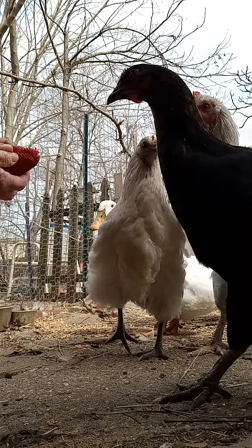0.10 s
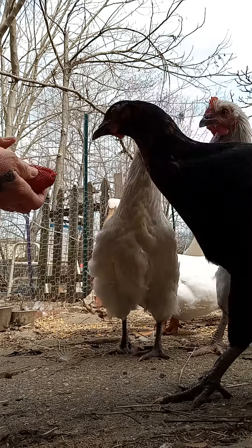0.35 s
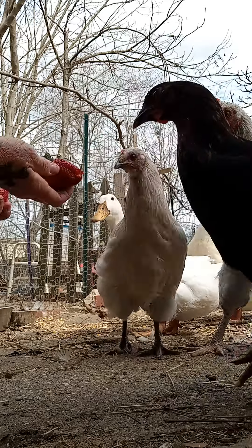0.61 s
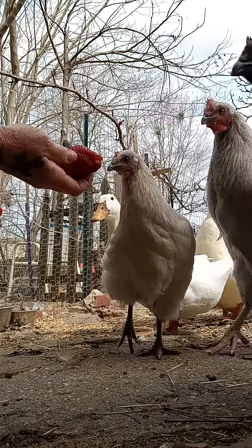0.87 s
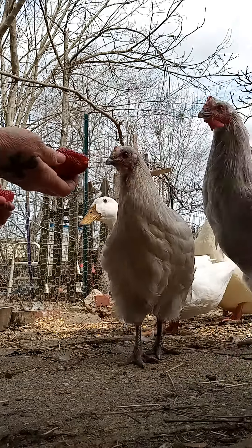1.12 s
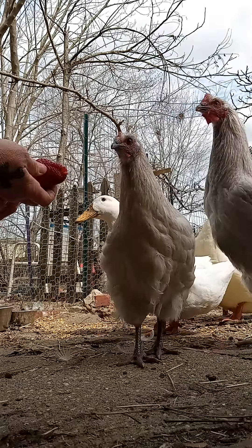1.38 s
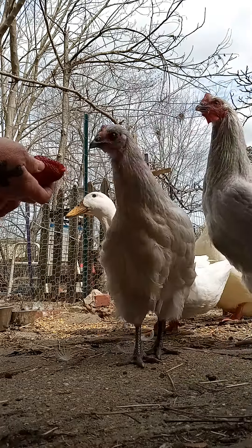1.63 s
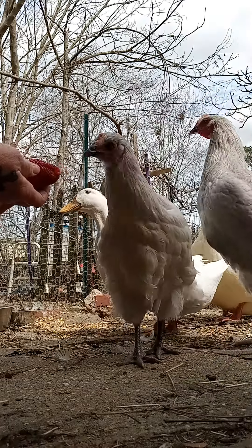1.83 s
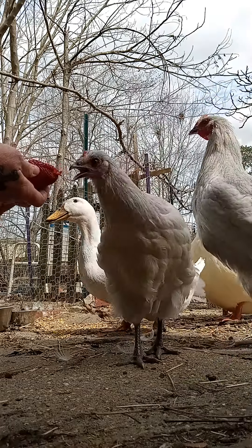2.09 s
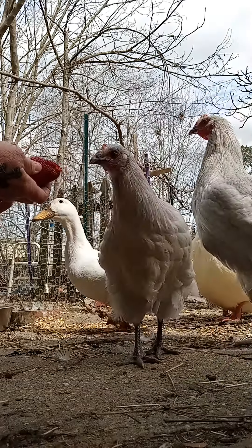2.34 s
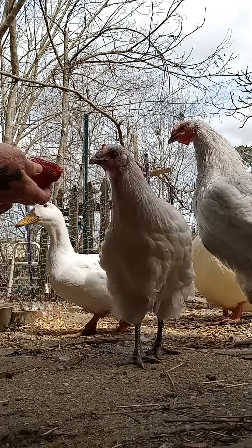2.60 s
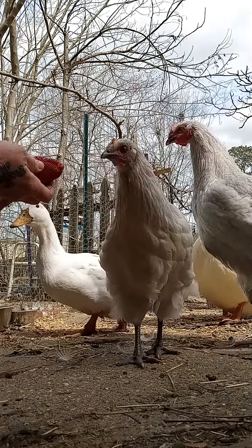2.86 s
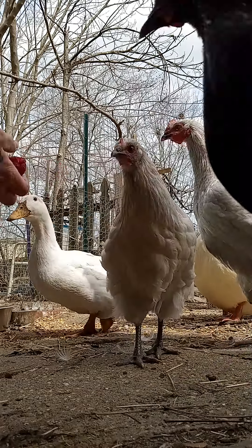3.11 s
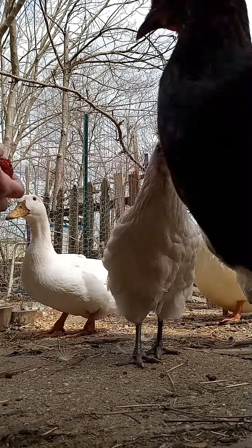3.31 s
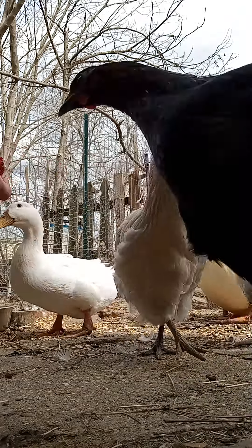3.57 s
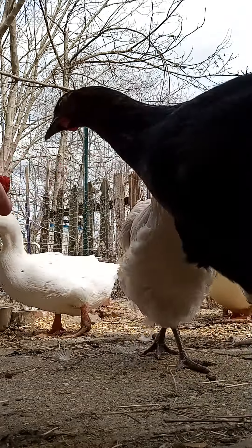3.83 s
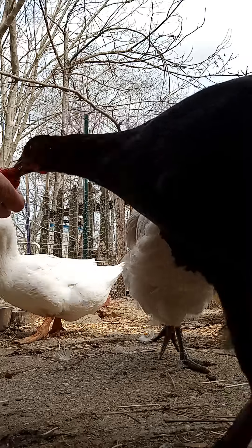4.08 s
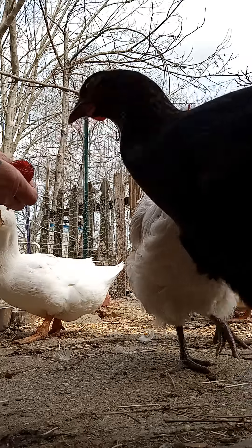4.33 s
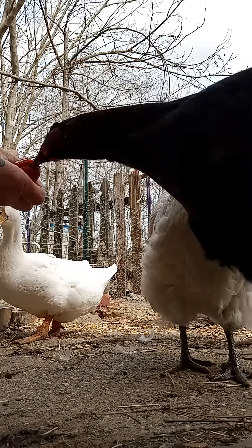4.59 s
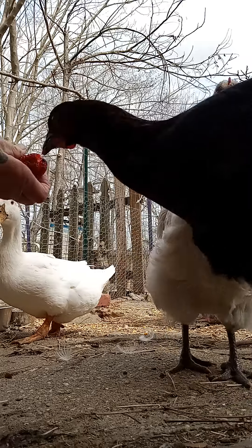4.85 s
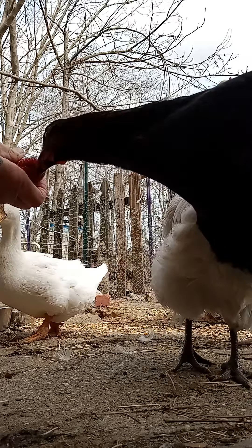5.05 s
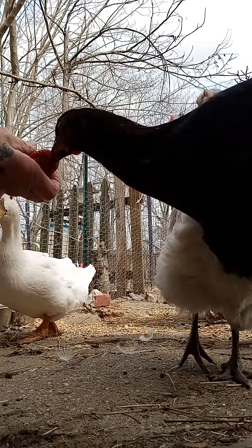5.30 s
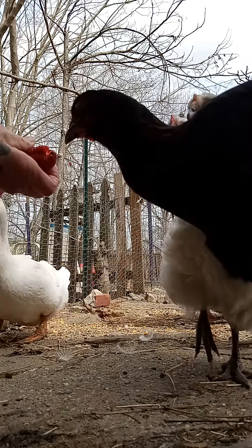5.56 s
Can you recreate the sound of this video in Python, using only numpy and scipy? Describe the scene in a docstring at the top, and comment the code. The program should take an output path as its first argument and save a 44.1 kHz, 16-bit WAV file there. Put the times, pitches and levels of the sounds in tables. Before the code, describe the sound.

Ducks rasp in quick, breathy low quacks while chickens cluck and peep close by, with loud squeak-led quacks around two seconds, outdoors.

```python
"""Low clucks over steady yard noise and a far engine drone, close to a two-port microphone; loud quacks later.
Litter rustles (noise grains), drakes rasp (breathy pulses through resonances), a duck gives arched peeps
(gliding tones), short high tones decay, and coos, falling peeps and squeaks glide (overtones).
Later a far bird whistles (near sines) and bills tap (noise knocks through short modes)."""
import sys
import numpy as np
from scipy import signal
from scipy.io import wavfile

SR = 44100
rng = np.random.default_rng(int(sys.argv[2]) if len(sys.argv) > 2 else 0)


def store_wav(level_fs):
    """Save 16-bit WAV to argv[1]."""
    pcm = np.round(np.clip(np.atleast_2d(level_fs), -1, 1) * 32767)
    wavfile.write(sys.argv[1], SR, pcm.T.astype(np.int16))


def volts_from_decibels(level):
    """Turn decibel levels (scalar or array-like) into linear amplitude factors."""
    exponent = np.asarray(level, float) / 20
    return 10 ** exponent


N = 250929


def rms_one(x):
    """Scales to unit rms."""
    return x / np.sqrt(np.mean(x ** 2) + 1e-20)


def at_time(rows, sample):
    """Table columns interpolated linearly in time."""
    s, *columns = np.transpose(rows)
    return [np.interp(sample / SR, s, c) for c in columns]


def at_hz(points, hz):
    """Table value interpolated over log frequency."""
    table_hz, value = np.transpose(points)
    return np.interp(np.log(hz), np.log(table_hz), value)


def drift(rate_hz, size):
    """Two-pole low-passed noise of unit rms."""
    r = np.exp(-2 * np.pi * rate_hz / SR)
    slow = signal.lfilter([1], [1, -2 * r, r * r], rng.standard_normal(size + 4000))[4000:]
    return rms_one(slow)


def resonance(x, hz, width_hz):
    """Two-pole resonator with zeros at DC and Nyquist."""
    r = np.exp(-np.pi * width_hz / SR)
    b = np.array([1, 0, -1]) * (1 - r * r) / 2
    return signal.lfilter(b, [1, -2 * r * np.cos(2 * np.pi * hz / SR), r * r], x)


def band(x, low_hz, high_hz):
    """Butterworth band-pass."""
    return signal.sosfilt(signal.butter(2, [low_hz, high_hz], "band", fs=SR, output="sos"), x)


def high_pass(hz):
    """Second-order Butterworth high-pass sections."""
    return signal.butter(2, hz, "high", fs=SR, output="sos")


def add(out, x, at, pan_db, lag_ms):
    """Places a sound between the two ports by level (left minus right) and arrival time (left lag)."""
    lag = round(lag_ms * SR / 1000)
    for ear, start, db in ((0, at + max(lag, 0), pan_db / 2), (1, at + max(-lag, 0), -pan_db / 2)):
        out[ear, start:start + len(x)] += volts_from_decibels(db) * x[:N - start]


def arch(share, top_share, rise, fall, bend):
    """How far a rise and fall lies under its top, at each share 0-1 of a call."""
    top_share = np.clip(top_share, .05, .95)
    early = np.maximum(1 - share / top_share, 0)
    late = np.maximum((share - top_share) / (1 - top_share), 0)
    return rise * early ** bend + fall * late ** bend


def span(s, length_s, onset_s=0.0016):
    """First sample, fades at both ends and the share 0-1 of a call that has passed."""
    t = np.arange(round(length_s * SR)) / SR
    fade = np.clip(np.minimum(t / onset_s, (length_s - t) / 0.0041), 0, 1)
    return round(s * SR), fade, t / length_s


def pulses(per_s, jitter, spread_db, breath, puff_s):
    """One uneven flap per cycle, each followed by a decaying puff of turbulent air."""
    size = len(per_s)
    rate = per_s * (1 + jitter * drift(60, size))
    cycle = np.floor(rng.random() + np.cumsum(rate) / SR)
    flaps = np.diff(cycle, prepend=cycle[0]) * volts_from_decibels(spread_db * rng.standard_normal(size))
    puffs = signal.lfilter([1], [1, -np.exp(-1 / (puff_s * SR))], flaps)
    return flaps + breath * puffs * rng.standard_normal(size) + 1e-18


def breath_noise(turn, low_hz, high_hz):
    """Air noise gated by the voice's phase, with steep band edges."""
    gated = rng.standard_normal(len(turn)) * (1 + np.sin(turn))
    return rms_one(band(band(gated, low_hz, high_hz), low_hz, high_hz))


# low clucks and squeak-led loud quacks: t/s, length/s, first f/Hz, last f/Hz, level/dB
CLUCKS_QUACKS = [(0.0, 0.014, 201.2, 203.5, -30.5), (0.037, .062, 172.8, 169.4, -25.5),
                 (1.028, 0.04, 215.7, 183.9, -32.5), (1.251, 0.037, 268.3, 267, -37),
                 (1.828, 0.062, 218.5, 163.6, -32.5), (2.14, 0.091, 238.7, 172.3, -25),
                 (2.504, 0.082, 239.2, 171.2, -23.5)]
# throat resonances shared by both: f/Hz, width/Hz, level/dB
THROAT = [(219, 270, 4), (560, 86, 5), (688, 59, 3), (1099, 107, 5), (1310, 104, -1), (1637, 74, -2.5),
          (2258, 310, -9.5), (3003, 98, -18), (3717, 105, -11.5), (4080, 300, -20.5), (5760, 660, -18),
          (7170, 77, -45), (10200, 510, -43.5), (15130, 1300, -48)]
# left-right place of the calls: t/s, left-right level/dB, left lag/ms
CALL_AT = [(.05, -3.5, -0.14), (.64, 2, 0.025), (.85, -8.5, -0.063), (1.05, -2, -0.39), (1.27, -2, -0.24),
           (1.8, -6, 0.18), (1.86, -0.5, -0.1), (2.2, -6.5, 0), (2.26, 11, -0.39), (2.4, -7.5, -0.18),
           (2.54, -2, 0.021), (3.7, -28.5, -0.64), (4.3, 10, -0.15), (5.6, -3, -0.16)]


def clucks_and_quacks():
    """Quick, fairly even flaps through fixed throat resonances."""
    out = np.zeros((2, N))
    peak_share, rise_db, fall_db, bend = 0.48, 9.5, 20.5, 2.1
    for s, length_s, first_hz, last_hz, peak_db in CLUCKS_QUACKS:
        at, fade, share = span(s, length_s, onset_s=0.0057)
        hz = first_hz + (last_hz - first_hz) * share ** 1.5   # pitch moves late
        level_db = peak_db - arch(share, peak_share, rise_db, fall_db, bend)
        # tilt per octave: dulls through the call; louder and higher ones are set brighter
        tilt_db = 2 - 3.5 * share
        tilt_db += 0.2769 * (peak_db + 25.5) + 3.7 * np.log2(first_hz / 210)
        rough = np.clip(3600 / len(hz), 1, 2.5)   # short calls are rougher
        source = pulses(hz, jitter=.017 * rough, spread_db=1.8 * rough, breath=.05 * rough, puff_s=.0015)
        # the treble peaks and gives out first
        treble_db = -arch(share, peak_share / 2, 6, 10.3, 1.5)
        voice = 0
        for mode_hz, width_hz, db in THROAT:
            ringing = rms_one(resonance(resonance(source, mode_hz, 2.5 * width_hz), mode_hz, width_hz))
            gain_db = db + tilt_db * np.log2(min(mode_hz, 2500) / 800)
            if mode_hz > 2500:
                gain_db = gain_db + treble_db + 4.1 * drift(70, len(hz))
            voice = voice + volts_from_decibels(gain_db) * ringing
        # rasp between the overtones
        voice += volts_from_decibels(-24) * rms_one(band(source * rng.standard_normal(len(hz)), 500, 2600))
        add(out, volts_from_decibels(level_db - 6.5) * fade * voice, at, *at_time(CALL_AT, at))
    return out


# yard noise spectrum: f/Hz, relative density level/dB
YARD = [(15, -48), (25, -26.5), (108, 2.5), (180, -1), (384, -12.5), (936, -13), (1040, -8), (1130, -17),
        (2350, -21), (4870, -30.5), (6400, -27), (8000, -49), (10000, -33), (12500, -42), (14800, -34.5),
        (16000, -45)]
# left-right likeness of the yard noise: f/Hz, likeness [-1..1]
LIKENESS = [(30, .6), (60, 0.95), (150, 0.97), (300, 0.99), (800, 0.55), (2000, 0), (16000, 0.22)]
# far engine drone: t/s, level/dB (before a fixed trim)
HUM = [(0.0, -71), (0.81, -87), (1.11, -65.5), (2.63, -78), (3.04, -65.5), (3.68, -61.5), (5.69, -88)]


def background():
    """Half-octave bands of stereo noise, each with its own level, flicker and likeness, plus a narrow drone."""
    out, edges_hz = 0, 22 * 2 ** np.arange(0, 9.6, .5)
    white = rng.standard_normal((2, 2, N))   # neighbouring bands get unrelated noise
    for k, (low_hz, high_hz) in enumerate(zip(edges_hz, edges_hz[1:])):
        mid, side = band(band(white[k % 2], low_hz, high_hz), 0.92 * low_hz, 1.09 * high_hz)
        hz = np.sqrt(low_hz * high_hz)
        alike = np.clip(at_hz(LIKENESS, hz), -1, 1)
        flicker = np.repeat(drift(300, N // 50 + 1), 50)[:N]   # held 50 samples: 6 Hz
        stereo = np.sqrt(1 + alike) * mid + np.sqrt(1 - alike) * side * [[1], [-1]]
        out = out + volts_from_decibels(at_hz(YARD, hz) + 2.0 * flicker) * stereo
    drone = rms_one(resonance(resonance(white[0, 0, ::-1], 90.5, 30), 90.5, 30))
    drone_db = at_time(HUM, np.arange(N))[0] - 1.5
    return volts_from_decibels(-60) * rms_one(out) + volts_from_decibels(drone_db) * drone


# clearest hiss bursts: litter rustles, and the hissing top of two loud calls (2.1445 s, 2.5017 s):
# t/s, level/dB, t60/s (clipped when played), lower band level/dB, left-right level/dB
HISSES = [(.0578, -56.5, 0.049, 15, 12.5), (.1055, -54.5, 0.05, -10, -14.5), (.196, -53, .16, 9.5, -5),
          (.4155, -57, 0.13, 18, 2.5), (.7806, -61, 0.38, 1.5, -10), (.8306, -43.5, 0.088, -12.5, -2),
          (.9394, -44.5, .11, 18.5, 4.5), (1.8013, -70, 0.12, 0, -6.5), (2.1041, -57.5, 0.017, -24, 14),
          (2.1445, -49, 0.19, 23.5, -4.5), (2.5017, -47.5, 0.17, 25.5, 1.5), (3.3702, -58, 0.2, -26, 4),
          (3.699, -54.5, 0.09, 21.5, -4.5), (4.0277, -58, 0.06, 8, 9.5), (4.098, -46.5, 0.08, 10.5, -9.5),
          (4.1982, -55.5, 0.12, -13, -12), (4.374, -58, 0.32, 10.5, 8), (4.5096, -60.5, 0.11, 16, -5),
          (4.6833, -52.5, 0.6, 9.5, -4), (4.7558, -50, .056, 14, 7.5), (5.0332, -55, 0.023, -1, -3),
          (5.1163, -56, 0.12, 18.5, -0.5), (5.4036, -60.5, 0.22, 10, 2.5), (5.4783, -49.5, 0.017, -3, -4)]
# hiss top spectrum: f/Hz, relative level/dB
HISS_TOP = [(4410, -37), (7500, -44.5), (8250, -41), (11300, 24), (12800, -45.5), (14000, -41.5),
            (15000, 7), (16000, -1.5)]


def hiss_bursts():
    """Decaying clumps of noise grains: a thin top and a separate lower scratch."""
    top, lower = np.zeros((2, 2, N))
    # 14 faint ones at random, same columns as HISSES
    faint = rng.uniform([0, -67, .06, -5, -8], [N / SR - .3, -61, .16, 5, 8], (14, 5))
    for s, peak_db, t60_s, lower_db, pan_db in [*HISSES, *faint]:
        t60_s = np.clip(t60_s, .05, .2)
        t = np.arange(round(t60_s * SR)) / SR
        clumping = volts_from_decibels(3.5 * drift(300, 16000)[:len(t)])
        grains = rng.standard_normal((2, 16000))[:, :len(t)] * clumping
        burst = volts_from_decibels(peak_db - 6 - 60 * t / t60_s) * np.minimum(t / .008, 1) * grains
        add(top, burst[0], round(s * SR), pan_db, lag_ms=.02)
        add(lower, volts_from_decibels(lower_db) * burst[1], round(s * SR), pan_db, lag_ms=.1)
    edges_hz = np.geomspace(7500, 16000, 7)
    shaped = 0
    for low_hz, high_hz in zip(edges_hz, edges_hz[1:]):
        gain_db = at_hz(HISS_TOP, np.sqrt(low_hz * high_hz)) + 5.0
        shaped = shaped + volts_from_decibels(gain_db) * band(top, low_hz, high_hz)
    return shaped + band(lower, 4100, 7000)


# drake rasps: t/s, length/s, level/dB, flaps/Hz, top resonances level/dB
RASPS = [(0.088, 0.1, -35.5, 71.4, -21), (0.421, 0.11, -36, 77, -16), (0.67, 0.14, -35, 79, -12.5),
         (0.815, 0.077, -49, 49.7, -25), (1.207, 0.27, -50, 44.8, -19.5), (1.736, 0.13, -42.5, 58, -11.5),
         (2.001, .13, -35, 73.6, -18), (2.378, 0.11, -34, 75, -24), (2.636, 0.14, -34.5, 80.3, -16.5),
         (3.084, 0.12, -37, 74.5, -19.5), (3.333, 0.12, -34, 82, -16), (3.678, 0.11, -38.5, 74, -23.5),
         (3.928, 0.13, -34.5, 79.5, -21.5), (4.135, 0.11, -59.5, 48, -24), (4.348, 0.077, -39, 62, -26),
         (4.618, 0.12, -36.5, 76.4, -25.5), (4.894, 0.097, -40.5, 74.2, -21.5), (5.596, 0.11, -46, 77, -24)]
# drake windpipe and throat drum: f/Hz, width/Hz, level/dB
WINDPIPE = [(756, 210, -7.5), (1063, 79, 0), (1339, 158, 2), (1655, 128, 0), (2069, 140, -2.5),
            (2592, 310, -11), (3050, 180, -21.5), (3080, 146, -12), (3706, 137, 10), (4160, 242, 9.5),
            (5540, 390, -9.5), (6150, 130, -7)]
# left-right place of the rasps, from two drakes: t/s, left-right level/dB, left lag/ms
DRAKE_AT = [(0, -1.5, 0.38), (1.2, 2.5, 0.41), (2.0, -3.5, 0.4), (2.64, 0.5, .39), (3.1, -2.5, 0.4),
            (3.7, -3, 0.15), (4.3, -5.5, 0.29), (4.62, -1.5, -0.21), (5.6, -7, -0.11)]


def drakes():
    """Slow, breathy flaps ring the fixed resonances of the windpipe; more effort reaches higher ones."""
    out = np.zeros((2, N))
    rise_db, fall_db, bend_per_s = -1.5, 30.5, 19.1   # longer rasps hold their top longer
    for s, length_s, peak_db, per_s, top_db in RASPS:
        at, fade, share = span(s, length_s, onset_s=0.024)
        # slower flaps: later peak, fuller lows
        peak_share = 0.48 + .011 * (75 - per_s)
        low_db = -5.5 + 0.3676 * (75 - per_s)
        level_db = peak_db - arch(share, peak_share, rise_db, fall_db, max(1, bend_per_s * length_s))
        breath = .33 * (per_s / 80) ** 2
        source = pulses(per_s + 0 * fade, jitter=.06, spread_db=1.5, breath=breath, puff_s=.005)
        # per octave above 1300 Hz: less effort, weaker high resonances
        slack_db = -108 * (share - peak_share) ** 2 * 0.15 / length_s
        voice = 0
        for k, (hz, width_hz, db) in enumerate(WINDPIPE):
            ringing = rms_one(resonance(resonance(source, hz, 3.5 * width_hz), hz, width_hz))
            colour_db = low_db if hz < 1450 else top_db if hz > 3400 else 0
            if 1500 < hz < 1900:   # slow flaps let the throat drum ring out
                colour_db += .3 * (80 - per_s)
            gain_db = db + colour_db + slack_db * np.log2(max(hz, 1300) / 1300)
            voice = voice + (-1) ** k * volts_from_decibels(gain_db) * ringing
        add(out, volts_from_decibels(level_db - 5) * fade * voice, at, *at_time(DRAKE_AT, at))
    return out


# arched peeps: t/s, length/s, top f/Hz, level/dB
PEEPS = [(0.27, 0.059, 1031, -38.5), (0.444, 0.058, 936, -35.5), (1.732, 0.068, 1091, -42.5),
         (2, 0.065, 1131, -39), (2.901, .076, 1047, -39.5), (3.134, 0.073, 1047, -36.5),
         (3.338, 0.066, 1131, -35)]
# low bumps, most of them opening a peep: t/s, level/dB
BUMPS = [(0.262, -31.5), (0.438, -33), (1.729, -24), (1.993, -27.5), (2.455, -34.5), (2.901, -26),
         (3.131, -28), (3.331, -30)]


def peeping_duck():
    """A gliding tone with its octave and a rough sum tone from a second, steady membrane; low bumps."""
    out = np.zeros((2, N))
    top_share, bend, start_pitch, end_hz = 0.391, 1.766, .72, 540   # start_pitch: share of top pitch
    membrane_hz = 762
    for s, length_s, top_hz, peak_db in PEEPS:
        at, fade, share = span(s, length_s)
        size = len(share)
        hz = top_hz - arch(share, top_share, (1 - start_pitch) * top_hz, top_hz - end_hz, bend)
        level_db = peak_db - arch(share, top_share, 13.5, 0.5, bend)
        turn = 2 * np.pi * np.cumsum(hz * (1 + 0.0033 * drift(120, size))) / SR
        summed = turn + 2 * np.pi * membrane_hz * np.arange(size) / SR + .5 * drift(100, size)
        lift_db = -6.0 * ((hz + membrane_hz - 1830) / 300) ** 2   # the throat favours the top of the arch
        voice = np.sin(turn) + volts_from_decibels(-17.5) * np.sin(2 * turn)
        voice += volts_from_decibels(lift_db - 4.5) * np.sin(summed) + volts_from_decibels(2 * lift_db - 25.5) * np.sin(2 * summed)
        voice += volts_from_decibels(-22) * breath_noise(turn, 1200, 4200)
        gain = volts_from_decibels(level_db + 6.0 + 2.13 * drift(75, size))
        add(out, gain * fade * voice, at, pan_db=-5.0, lag_ms=-.12)
    for s, peak_db in BUMPS:
        t = np.arange(1500) / SR
        swing = np.sin(2 * np.pi * 200 * t)
        swing += volts_from_decibels(-2) * np.sin(2 * np.pi * 510 * t + 3 * rng.random())
        swing += volts_from_decibels(-4.0) * np.sin(2 * np.pi * 790 * t)
        envelope = np.minimum(t / .004, 1) * np.exp(-(t / .02) ** 2) * volts_from_decibels(2.5 * drift(120, len(t)))
        add(out, volts_from_decibels(peak_db - 12) * envelope * swing, round((s - .002) * SR), pan_db=-3.5, lag_ms=-.12)
    return out


# short high tones, some thin and faint, of unknown source: t/s, f/Hz, level/dB, t60/s
HIGH_TONES = [(.383, 6230, -56, .1), (.599, 5610, -52, .085), (1.035, 7670, -62, .1),
              (1.26, 7230, -51, .07), (1.546, 5450, -53, .085), (1.545, 6000, -63, .08),
              (3.115, 6724, -61, .6), (3.115, 6970, -67, .3), (3.113, 8570, -52, .04),
              (4.138, 6480, -59, .21), (4.32, 5620, -54, .11), (4.374, 7100, -49, .4),
              (4.372, 8780, -50, .25), (4.373, 6760, -62, .6), (4.372, 13200, -60, .1),
              (4.372, 15100, -60, .1), (4.7, 6530, -57, .38), (5.345, 6540, -66, 1),
              (5.346, 6950, -66, .45), (5.345, 8333, -56, .4), (5.345, 12800, -64, .15),
              (5.343, 14390, -62, .1), (5.405, 12800, -63, .12), (5.405, 14400, -62, .1),
              (5.57, 5700, -53, .075)]


def high_tones():
    """Each is one wavering tone that dies away; the short lower ones are blurred and start softly."""
    out = np.zeros((2, N))
    for s, hz, peak_db, t60_s in HIGH_TONES:
        t = np.arange(round(t60_s * SR)) / SR
        blurred = t60_s < .12 and hz < 9000
        waver_rad = 2.5 * drift(120, len(t)) if blurred else .67 * drift(40, len(t))
        onset_s = .006 if blurred else .002
        tone = np.sin(2 * np.pi * hz * t + waver_rad) * np.minimum(t / onset_s, 1)
        add(out, volts_from_decibels(peak_db - 60 * t / t60_s) * tone, round(s * SR), pan_db=-4.5, lag_ms=.03)
    return out


def clear_voice(hz, level_db, step_db):
    """Six overtones with some breath; a throat resonance lifts whichever overtone lies near 740 Hz."""
    turn = 2 * np.pi * np.cumsum(hz * (1 + .007 * drift(100, len(hz)))) / SR
    gains = []
    for k in range(6):
        lift_db = 17.5 * np.exp(-(((k + 1) * hz - 740) / 63) ** 2)
        gains.append(volts_from_decibels(step_db * k - 1.5 * k * k + lift_db))
    voice = sum(gains[k] * np.sin((k + 1) * turn + k) for k in range(6)) / np.max(gains, axis=0)
    breath = breath_noise(turn, 470, 3600)
    return volts_from_decibels(level_db + 2.5 + 2.74 * drift(84, len(hz))) * (voice + volts_from_decibels(-18) * breath)


# clear gliding calls (coos, falling peeps and one far call): t/s, length/s, first f/Hz, last f/Hz, level/dB
GLIDES = [(.628, .03, 390, 426, -41.5), (0.82, 0.047, 589, 518, -28), (0.902, 0.013, 610, 600, -39),
          (2.093, 0.034, 476, 360, -40), (2.223, 0.066, 433, 387, -38), (2.376, 0.059, 572, 356, -37.5),
          (2.721, 0.043, 560, 407, -43), (2.768, 0.036, 735, 400, -44.5), (4.288, 0.081, 1445, 1336, -53.5)]
# squeaks that lead into the loud quacks: t/s, length/s, nominal f/Hz, level/dB
SQUEAKS = [(1.787, 0.053, 853, -29), (2.131, 0.022, 863, -28), (2.49, 0.024, 903, -28)]
# short pips that open some rasps: t/s, level/dB
PIPS = [(.414, -50.5), (.811, -30), (1.165, -49.5), (3.078, -48), (3.675, -47.5), (4.347, -40),
        (5.585, -42.5)]


def clear_calls():
    """Gliding calls slide in pitch, squeaks swell and slip down, pips are short and fade from the start."""
    out = np.zeros((2, N))
    for s, length_s, first_hz, last_hz, peak_db in GLIDES:
        at, fade, share = span(s, length_s)
        level_db = peak_db - arch(share, .3, 6, 10, 3.9)
        hz = first_hz + (last_hz - first_hz) * share ** .8
        hz = hz * (1 + 0.021 * drift(14, len(fade)))
        add(out, fade * clear_voice(hz, level_db, step_db=-6.5), at, *at_time(CALL_AT, at))
    for s, length_s, hz, peak_db in SQUEAKS:
        at, fade, share = span(s, length_s)
        level_db = peak_db - arch(share, 0.93, 10, 16, 4.0)
        squeak = clear_voice(hz * (1.03 - .07 * share), level_db, step_db=-1.5)
        add(out, fade * squeak, at, *at_time(CALL_AT, at))
    for s, peak_db in PIPS:
        at, fade, share = span(s, 0.02)
        hz = 758 + (745 - 758) * share
        add(out, fade * clear_voice(hz, peak_db - 11.0 * share, step_db=-7.5), at, *at_time(CALL_AT, at))
    return out


# thin far whistles: t/s, length/s, f/Hz, level/dB
WHISTLES = [(3.034, 0.1, 2450, -61), (3.569, 0.18, 1047, -59.5), (3.59, 0.13, 2800, -69),
            (4.121, 0.29, 1392, -45.5), (4.358, .26, 2680, -59), (4.441, 0.16, 1400, -57.5),
            (4.77, 0.35, 1203, -59), (4.91, 0.15, 3190, -63)]


def whistles():
    """Near sines from a bird further off."""
    out = np.zeros((2, N))
    for s, length_s, hz, peak_db in WHISTLES:
        at, fade, share = span(s, length_s)
        level_db = peak_db - arch(share, 0.1, 4, 12, 0.78)
        tone = np.sin(2 * np.pi * np.cumsum(hz * (1 + 0.0024 * drift(60, len(fade)))) / SR)
        gain = volts_from_decibels(level_db + 3 + 1.5 * drift(40, len(fade)))
        add(out, gain * fade * tone, at, pan_db=1.0, lag_ms=-.27)
    return out


# bills tapping and small ticks: t/s, level/dB, main mode f/Hz
PECKS = [(3.641, -52, 1050), (4.141, -35, 726), (4.162, -44.5, 1410), (4.18, -42.5, 720), (4.202, -44, 895),
         (4.231, -42.5, 790), (4.254, -62, 1430), (4.831, -53, 1240), (5.052, -58, 2320),
         (5.394, -47.5, 2520), (5.481, -52, 636)]


def pecks():
    """A dull contact rings a few short modes."""
    out, t = np.zeros((2, N)), np.arange(900) / SR
    for s, peak_db, hz in PECKS:
        knock = rng.standard_normal(len(t)) * t * np.exp(-t / .003)
        tap = resonance(knock, hz, 110)
        tap += volts_from_decibels(-9) * resonance(knock, 2330, 440) + volts_from_decibels(-6) * resonance(knock, 476, 120)
        tap = band(tap, 300, 3200)
        add(out, volts_from_decibels(peak_db) * tap / np.abs(tap).max(), round(s * SR), pan_db=-6.5, lag_ms=0.12)
    return out


def yard(x):
    """Ground, fence and walls scatter a short dull tail, another one at each port."""
    t60_s = .16
    t = np.arange(round(t60_s * SR)) / SR
    echoes = rng.standard_normal((2, 30000))[:, :len(t)] * volts_from_decibels(-60 * t / t60_s) * (t > .002)
    echoes = band(echoes, 410, 4500)
    echoes /= np.sqrt(np.sum(echoes ** 2, axis=1, keepdims=True))
    return signal.fftconvolve(x, echoes, axes=1)[:, :N]


def scene():
    """Flock with yard tail, then the layers that get none."""
    near = clucks_and_quacks() + peeping_duck() + clear_calls() + pecks()
    far = drakes()
    flock = far + near + yard(volts_from_decibels(-9) * far + volts_from_decibels(-18) * near)
    flock = signal.sosfilt(high_pass(110), flock)   # small bodies send out no deep bass
    mid, side = flock.mean(axis=0), (flock[0] - flock[1]) / 2
    side = signal.sosfiltfilt(high_pass(330), side)   # long waves reach both ports alike
    return mid + side * [[1], [-1]] + background() + hiss_bursts() + high_tones() + whistles()


def low_pass(x):
    """Removes everything above the highest recorded frequency."""
    return signal.sosfilt(signal.butter(12, 16290, fs=SR, output="sos"), x)


def record(dry):
    """The upper treble is thinned and the top is cut steeply."""
    dip_hz, dip_share, top_hz = (7700, 13800), .5, 16150
    dip_band = signal.butter(4, dip_hz, "band", fs=SR, output="sos")
    dipped = dry - dip_share * signal.sosfiltfilt(dip_band, dry)
    mix = signal.sosfilt(signal.cheby2(12, 60, top_hz, fs=SR, output="sos"), dipped)
    return low_pass(mix)


dry = scene()
out = record(dry)
store_wav(out)
```